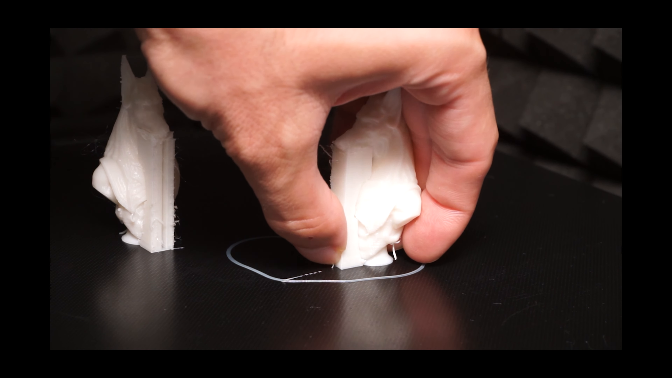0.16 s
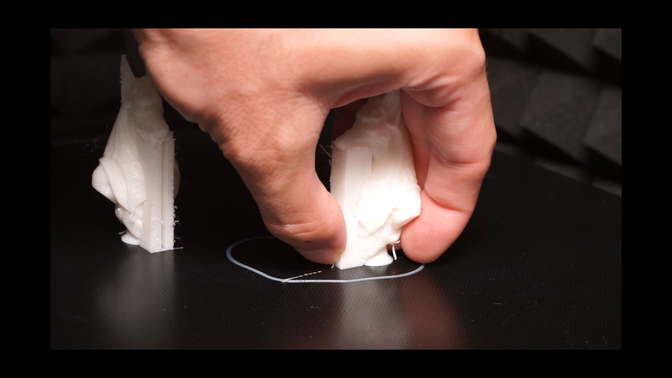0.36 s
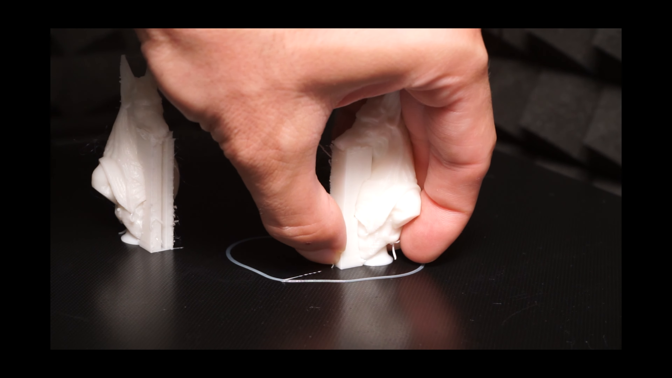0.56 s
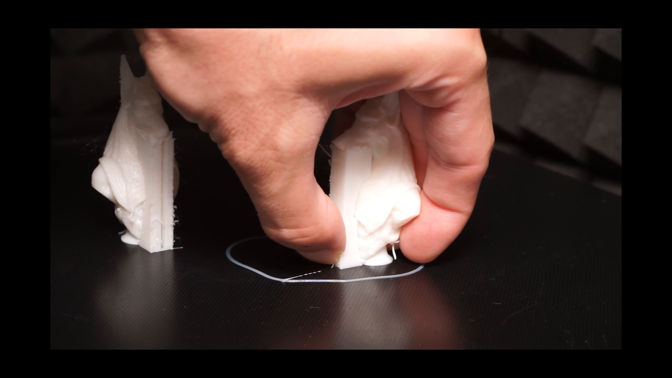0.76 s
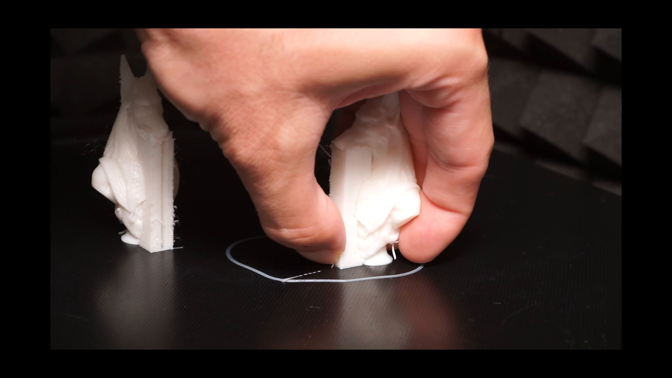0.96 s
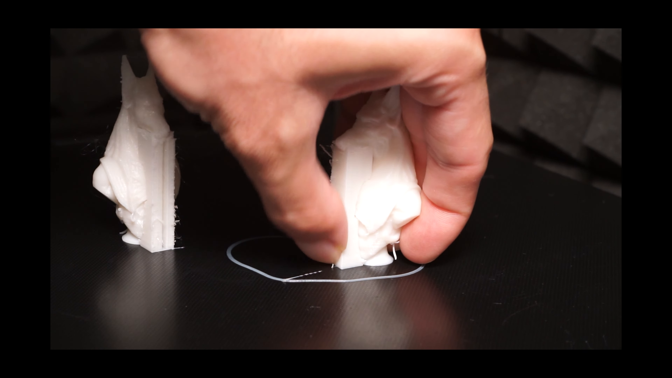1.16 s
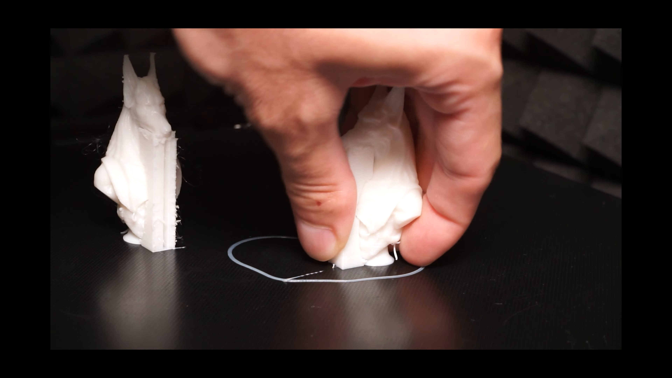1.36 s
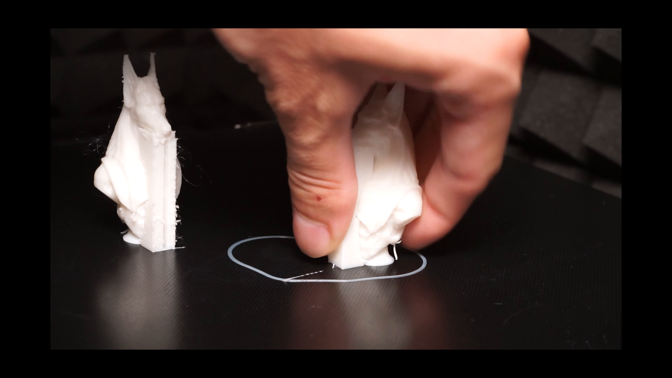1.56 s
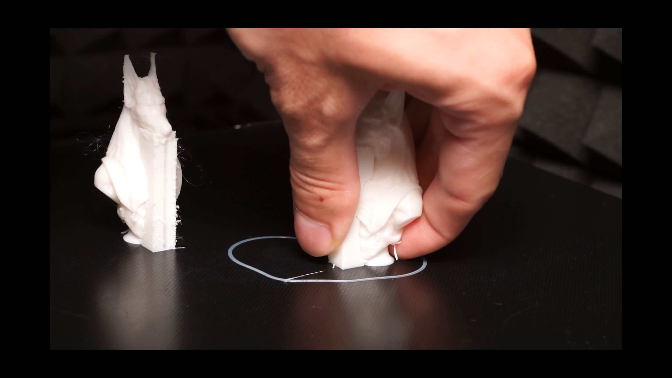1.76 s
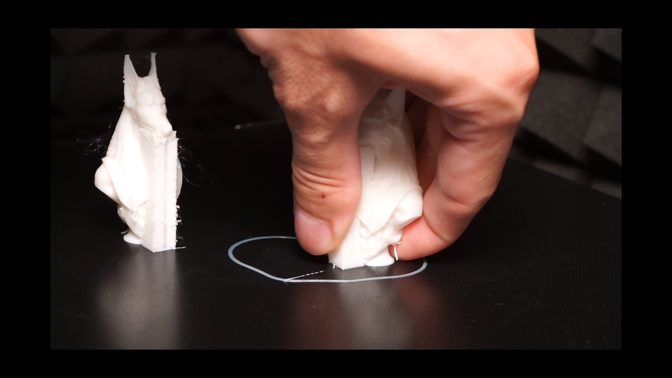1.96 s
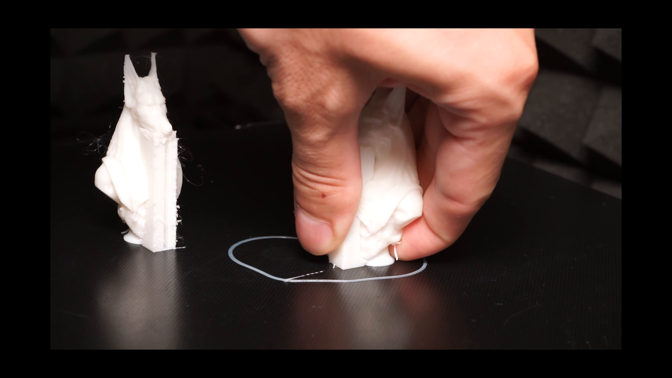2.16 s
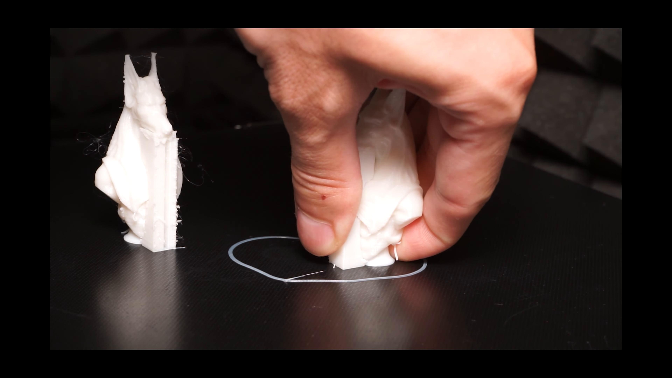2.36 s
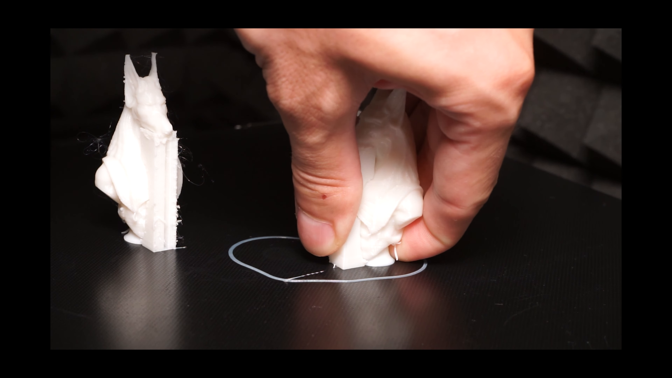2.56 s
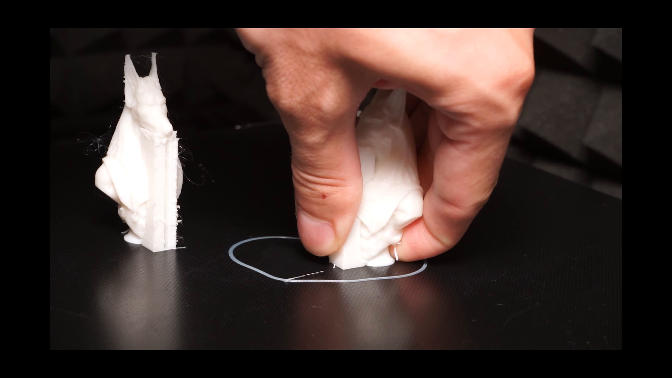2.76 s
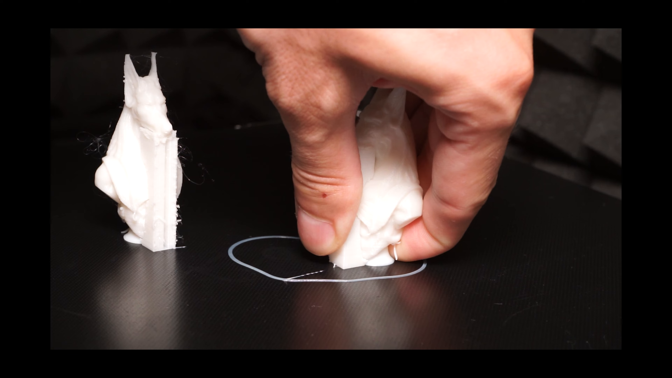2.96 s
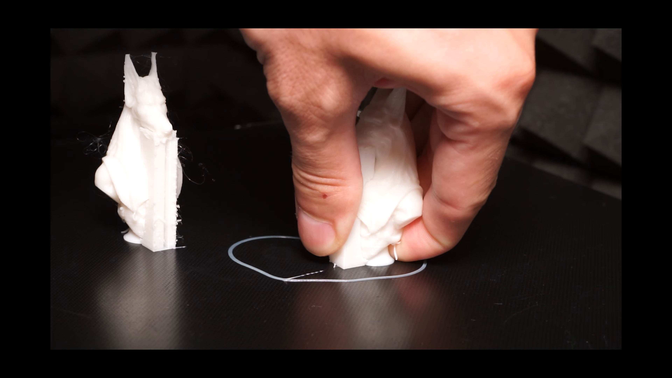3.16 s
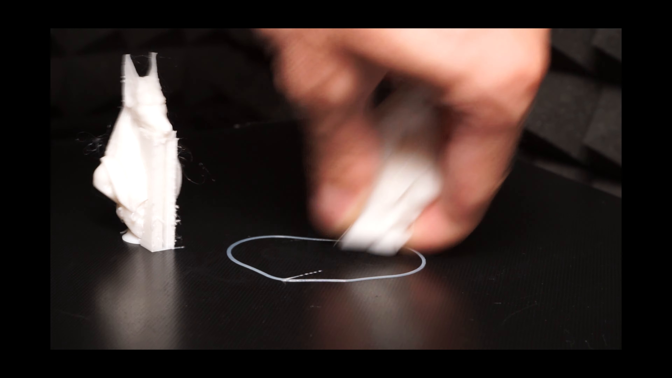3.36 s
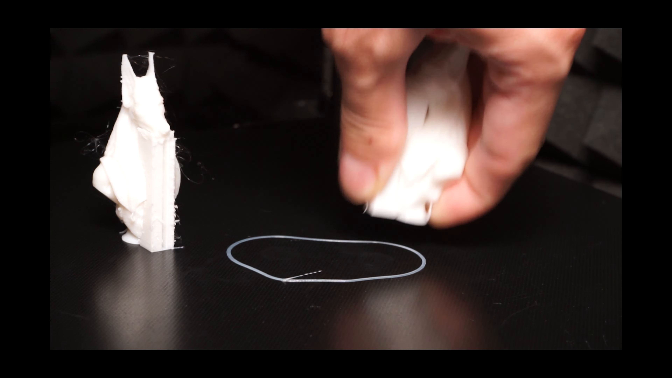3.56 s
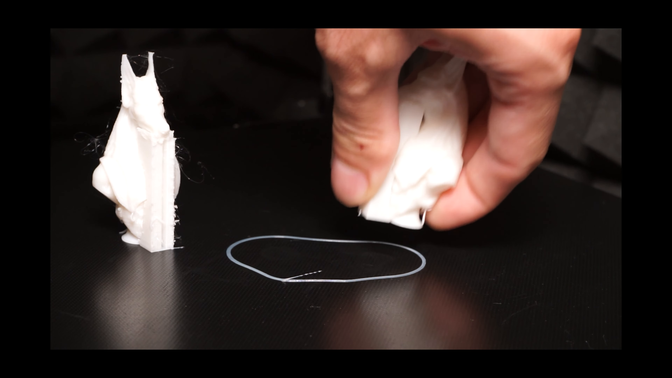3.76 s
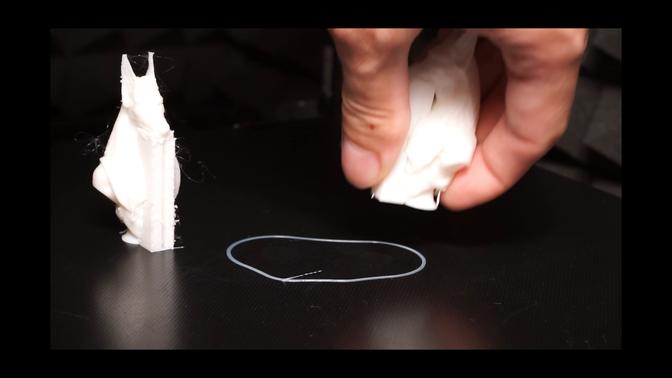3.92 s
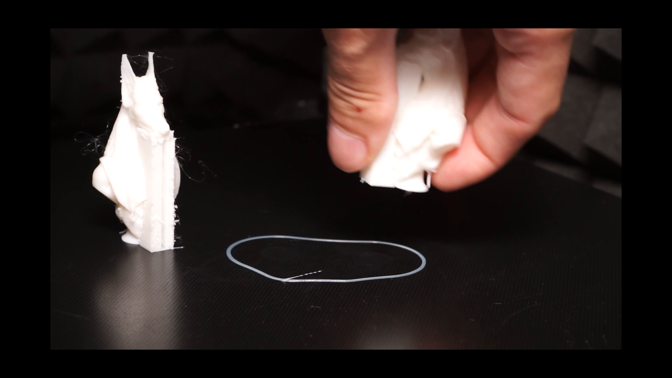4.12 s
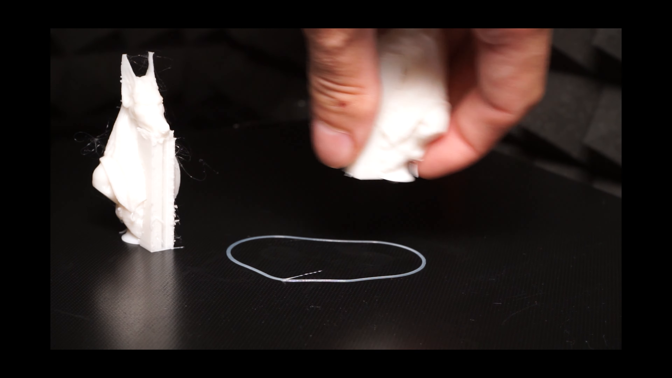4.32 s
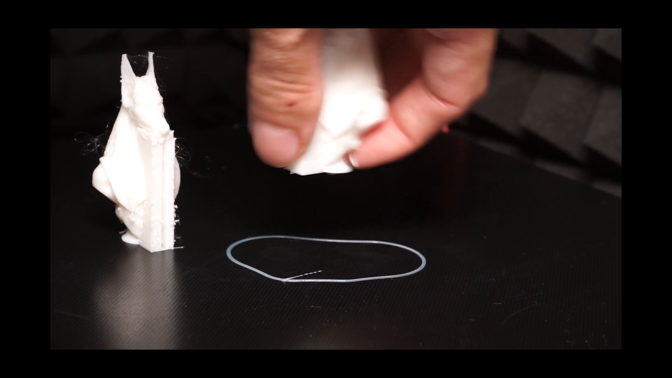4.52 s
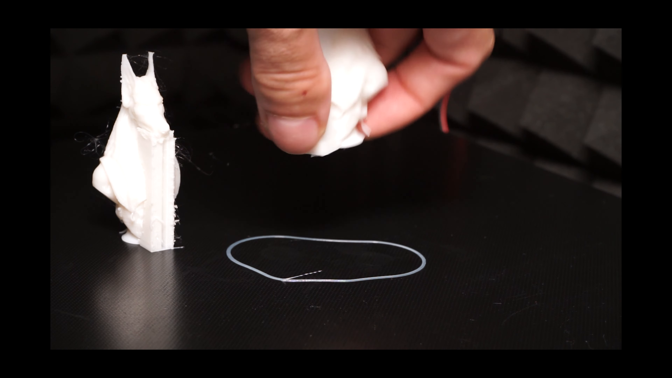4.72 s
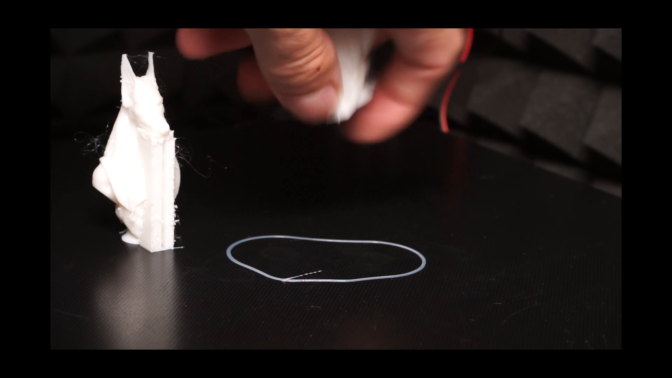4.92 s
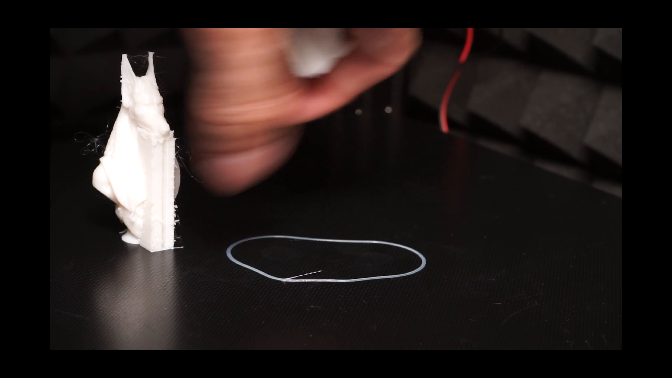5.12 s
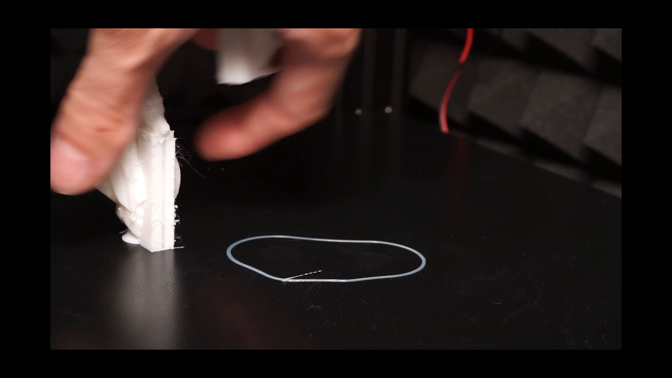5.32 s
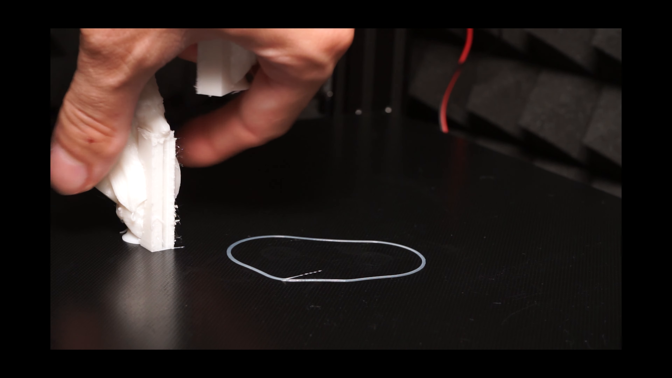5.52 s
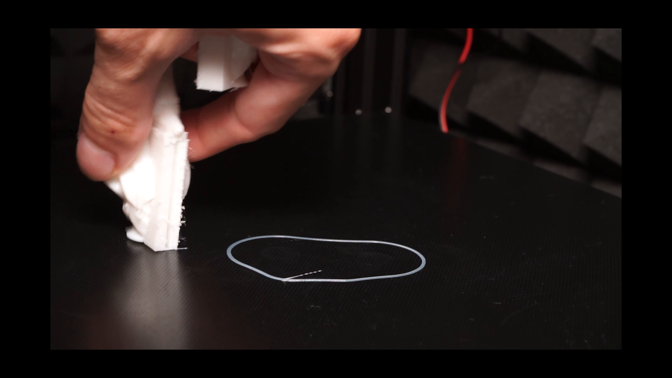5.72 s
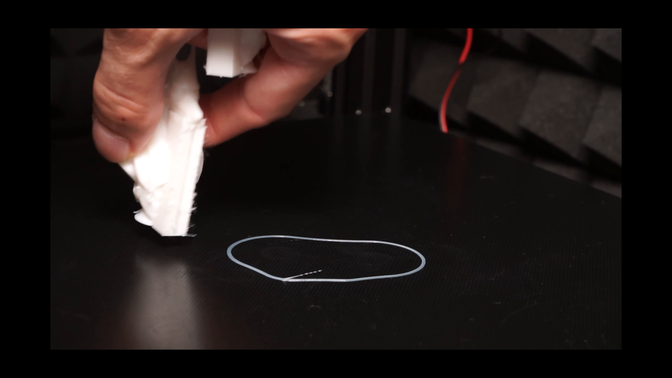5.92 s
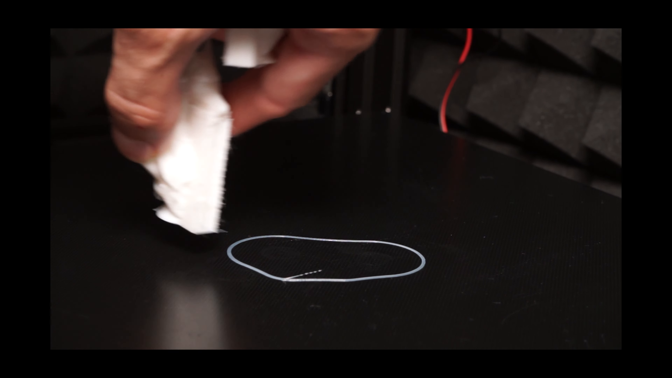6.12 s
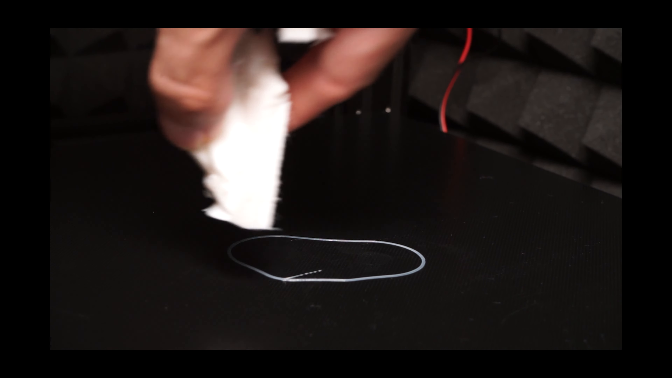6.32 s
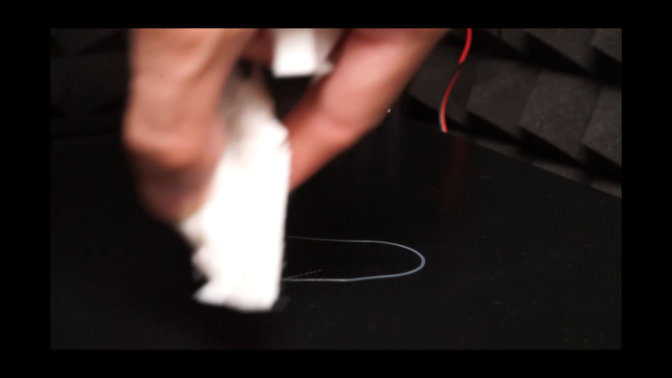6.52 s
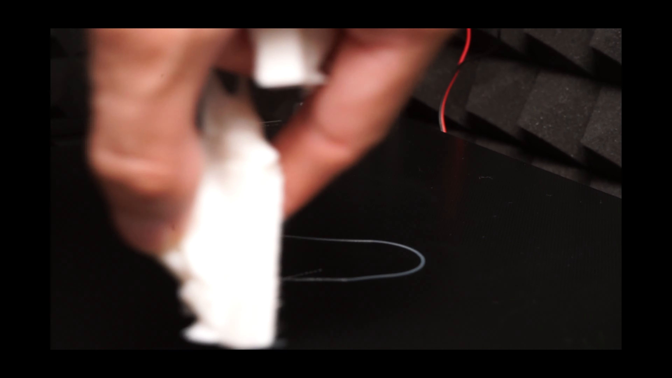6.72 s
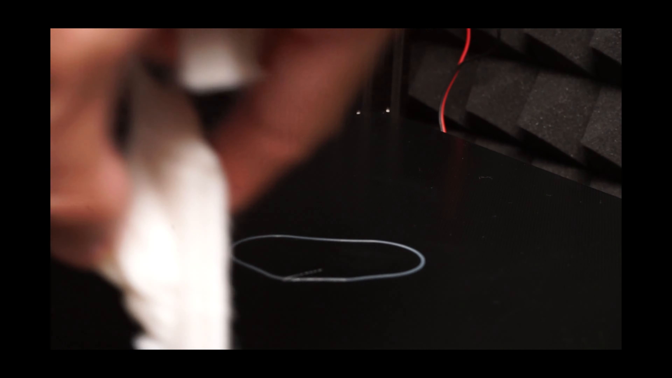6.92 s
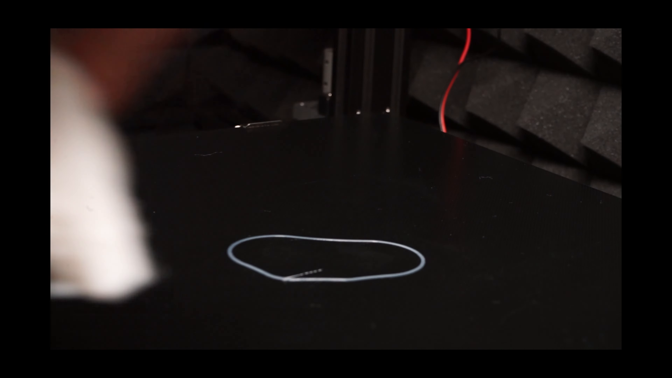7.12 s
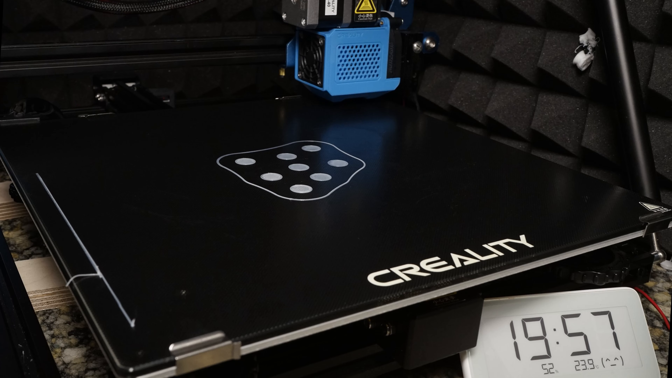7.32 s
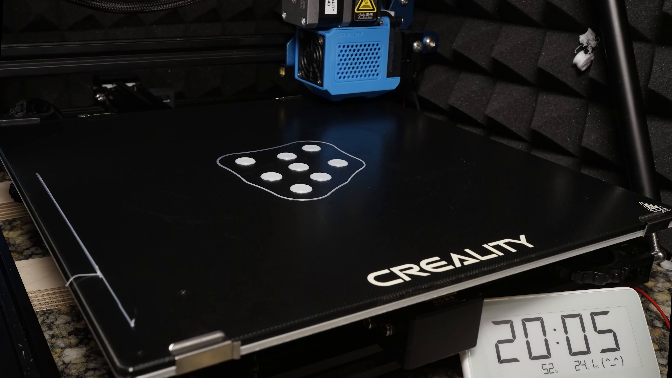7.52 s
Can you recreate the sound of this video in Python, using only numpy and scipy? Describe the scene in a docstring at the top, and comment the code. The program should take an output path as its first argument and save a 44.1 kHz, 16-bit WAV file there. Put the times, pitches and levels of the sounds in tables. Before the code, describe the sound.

A plastic print snaps loose from its bed in several close, dry cracks, followed by soft handling and pieces being set down.

```python
"""Close microphone on a printer bed, inside a foam-lined enclosure. A hand rocks a printed plastic piece,
and the bed sways under it. From 2.1 s the bond gives way in sharp cracks that ring piece and bed; the
last, at 3.4 s, frees the piece and leaves the bed swaying and rattling. From 4 s fingers rub over the
plastic's ridges. Around 7 s two pieces are set down farther off, and at 7.4 s the sound stops abruptly."""
import sys
import numpy as np
from scipy import signal
from scipy.fft import rfft, irfft, next_fast_len
from scipy.io import wavfile
from scipy.ndimage import uniform_filter1d

SR = 44100
rng = np.random.default_rng(int(sys.argv[2]) if len(sys.argv) > 2 else 0)


def wrap_up_sound(samples):
    """Save the sound to the file named by the first command line argument, as 16-bit audio."""
    columns = np.atleast_2d(samples).T
    # keep every value between -1 and 1, then stretch to whole-number steps
    tamed = np.clip(columns, -1, 1)
    steps = np.round(tamed * 32767).astype(np.int16)
    wavfile.write(sys.argv[1], SR, steps)


N = 334454
TIME = np.arange(N) / SR


def amp(db):
    """Decibels to gain."""
    return 10 ** (np.asarray(db) / 20)


def unit(x):
    """Scale to rms 1."""
    return x / np.sqrt(np.mean(x ** 2) + 1e-30)


def along(points, hz):
    """Read (frequency, value) points on a log frequency axis."""
    point_hz, values = np.transpose(points)
    return np.interp(np.log(hz + 1), np.log(point_hz), values)


def fade(t, t60):
    """Exponential decay by 60 dB in t60 seconds."""
    return np.exp(-np.log(1000) * t / t60)


def filtered(x, response):
    """Shape x with a gain given as a function of frequency."""
    size = next_fast_len(len(x) + 4096)
    return irfft(rfft(x, size) * response(np.fft.rfftfreq(size, 1 / SR)), size)[:len(x)]


def noise(spectrum):
    """Coloured noise of rms 1."""
    return unit(filtered(rng.standard_normal(N), lambda hz: amp(along(spectrum, hz))))


def resonances(modes, f):
    """Causal response at frequencies f of modes given as pitch_hz, width_hz, gain_db."""
    return sum(amp(db) * 1j * f * width / (hz * hz - f * f + 1j * f * width) for hz, width, db in modes)


def add(track, start_s, sound):
    """Mix a sound into the track."""
    start = max(0, round(start_s * SR))
    part = sound[:max(0, N - start)]
    track[start:start + len(part)] += part


# Room tone at the microphone: frequency_hz, gain_db
AIR_SPECTRUM = [(120, -37.5), (200, -7), (387, -3.5), (416, -4.5), (558, -6), (709, -7), (1080, -10.5),
                (1590, -14), (15100, -24.5), (16000, -27)]
def air(level_db=-75):
    """Faint, steady air in the enclosure."""
    return amp(level_db) * noise(AIR_SPECTRUM)


# Decay of the space around the bed: frequency_hz, t60_s
ROOM_DECAY = [(200, .4), (1000, 0.27), (4000, .31), (9000, 0.27), (15000, 0.19)]
def room(x):
    """A short, diffuse tail in which the treble dies first."""
    hz, t, spectrum = signal.stft(rng.standard_normal(SR // 2), SR, nperseg=256)
    tail = signal.istft(spectrum * fade(t, along(ROOM_DECAY, hz)[:, None]), SR, nperseg=256)[1]
    return signal.fftconvolve(x, tail / np.linalg.norm(tail))[:N]


# Effort of the hand on piece and bed: time_s, effort_db
HAND_EFFORT = [(0.0, -70.5), (0.2, -74), (1.25, -70.5), (1.49, -64.5), (2.26, -65), (2.78, -71),
               (3.06, -64), (3.43, -67), (3.57, -58), (3.71, -64), (4.36, -63), (4.49, -67), (4.96, -74),
               (5.57, -75), (5.87, -67), (6.21, -71), (7.2, -59), (7.24, -62)]
# Deep rumble and higher tremor of the bed: frequency_hz, gain_db
RUMBLE_SPECTRUM = [(15, -5), (30, -2.5), (48, -0.5), (70, 0), (100, -10), (160, -51)]
FLUTTER_SPECTRUM = [(60, -16), (105, 4.5), (135, 0.5), (200, -2), (300, -8.5), (500, -21), (1000, -31),
                    (3000, -48.5)]
def grip(mean_rumble_db=-60, rumble_growth=.65, flutter_gain_db=2):
    """The gripping hand shakes the bed gently: rumble and flutter both grow with its effort."""
    effort_db = np.interp(TIME, *np.transpose(HAND_EFFORT))
    rumble = amp(mean_rumble_db + rumble_growth * (effort_db - effort_db.mean())) * noise(RUMBLE_SPECTRUM)
    flutter = amp(effort_db + flutter_gain_db) * noise(FLUTTER_SPECTRUM)
    return rumble + flutter


# The hand shifting its hold: middle_s, length_s, hiss_db, rub_db
HAND_SLIDES = [(1.54, 0.96, -71.5, -68), (4.092, 1.36, -73.5, -82), (6.297, 0.87, -80.5, -88)]
# Hiss and low rub of sliding skin: frequency_hz, gain_db
SKIN_HISS = [(200, 0), (500, 8), (1000, 3), (2500, -1), (6000, -1), (9000, -2), (12000, -11.5),
             (16000, -18)]
SKIN_RUB = [(150, -14), (280, 0), (450, -2), (700, -10), (1400, -22), (3000, -45)]
def slides():
    """Each shift of the hand hisses and rubs softly, swelling and fading with its speed."""
    out, hiss, rub = np.zeros(N), noise(SKIN_HISS), noise(SKIN_RUB)
    for middle_s, length_s, hiss_db, rub_db in HAND_SLIDES:
        speed = np.cos(np.pi * np.clip((TIME - middle_s) / length_s, -.5, .5)) ** 2
        out += speed * (amp(hiss_db) * hiss + amp(rub_db) * rub)
    return out


# Fingertips dragged over the layer lines: start_s, length_s, level_db, squeak_hz
FINGER_RUBS = [(4.041, .0047, -72, 14100), (4.058, .053, -68.5, 14200), (4.121, 0.037, -72.5, 14600),
               (4.698, .021, -78.5, 14000), (4.945, .12, -76, 14600), (4.992, .015, -66, 8600),
               (5.649, .025, -76.5, 4900), (5.696, .045, -75, 9000), (5.963, 0.02, -75.5, 7800),
               (6.031, .025, -83, 5700), (6.277, .047, -80.5, 5000), (7.345, .019, -75, 10970)]
# Hiss of the printed ridges: frequency_hz, gain_db
RIDGE_SPECTRUM = [(2000, -6), (4500, -8), (5300, 1), (6500, -1), (8200, 5.5), (10000, -2.5), (11800, 5),
                  (13000, 1), (14500, -3.5), (16000, -21.5)]
def rubs(grain_db=3, edge_s=.0033, squeak_q=24):
    """Skin slips abruptly over the ridges: a grainy hiss with an equally strong, thin squeak."""
    out, t = np.zeros(N), np.arange(SR // 4) / SR
    for start_s, length_s, db, hz in FINGER_RUBS:
        stroke = np.minimum(t / edge_s, 1) * np.exp(-np.maximum(t - length_s, 0) / edge_s)
        roughness = unit(uniform_filter1d(rng.standard_normal(len(t)), size=120))
        grain = unit(amp(grain_db * roughness))
        friction = rng.standard_normal(len(t))
        hiss = unit(filtered(friction, lambda f: amp(along(RIDGE_SPECTRUM, f))))
        squeak = unit(filtered(friction, lambda f: resonances([(hz, hz / squeak_q, 0)], f)))
        add(out, start_s, amp(db) * stroke * grain * (hiss + squeak))
    return out


# Resonances of a blunt contact, in thuds and knocks: pitch_hz, width_hz, gain_db
BLUNT_MODES = [(230, 80, 0.5), (342.2, 130, -2), (510, 110, 3), (810, 150, -10.5), (947.5, 90, -13),
               (1251, 270, -22), (2410, 2700, -15), (5000, 1200, -22), (6950, 2300, -29.5),
               (11500, 2000, -30)]
def thud(hz, t60, rise_s):
    """A low, blunt ring about one octave wide that swells to about rms 1 and dies away."""
    t = np.arange(SR // 3) / SR
    octave = signal.butter(3, [hz / 1.4, hz * 1.4], "band", fs=SR, output="sos")
    ring = filtered(rng.standard_normal(len(t)), lambda f: resonances(BLUNT_MODES, f))
    swell = fade(t, t60) * (1 - np.exp(-t / rise_s))
    return unit(signal.sosfilt(octave, ring)) * swell / swell.max()


# Fingers bumping the pieces: start_s, level_db, pitch_hz
FINGER_BUMPS = [(.553, -51, 120), (1.285, -57, 240), (1.73, -56, 265), (5.662, -50, 405), (5.695, -57, 330),
                (5.72, -58.5, 444), (6.663, -52, 305), (7.346, -51, 230)]
def bumps():
    """Soft skin excites only the low resonances of a piece."""
    out = np.zeros(N)
    for start_s, db, hz in FINGER_BUMPS:
        add(out, start_s, amp(db) * thud(hz, t60=.12, rise_s=.0014))
    return out


# The four ranges of an impact (knock, body, bright, edge): low_hz, high_hz
IMPACT_BANDS = [(180, 1500), (1450, 4500), (4500, 10000), (11300, 15800)]
OCTAVES = np.log2(np.prod(IMPACT_BANDS, axis=1) / np.prod(IMPACT_BANDS[0])) / 2  # above the knock range
def impact(levels_db, modes, spike, spike_s, t60s):
    """A sharp release inside a dying burst of micro-fractures rings the modes, range by range."""
    t = np.arange(SR // 6) / SR
    sound = np.zeros(len(t))
    for band, db, t60 in zip(IMPACT_BANDS, levels_db, t60s):
        drive = rng.standard_normal(len(t)) * fade(t, t60) * np.minimum(t / spike_s, 1)
        drive /= np.linalg.norm(drive)
        drive[round(spike_s * SR)] += spike  # strength of the release against the burst
        ring = filtered(drive, lambda f: resonances(modes, f))
        ring = signal.sosfilt(signal.butter(4, band, "band", fs=SR, output="sos"), ring)
        sound += amp(db) * ring / np.linalg.norm(ring) * np.sqrt(.005 * SR)  # energy of 5 ms at this rms
    return sound


def tilted(db, tilt_db_per_octave):
    """Levels of body, bright and edge on a slope that pivots on the bright range."""
    return db + tilt_db_per_octave * (OCTAVES[1:] - OCTAVES[2])


# Resonances of the printed piece, in nail flicks, strands and cracks: pitch_hz, width_hz, gain_db
PIECE_MODES = [(245.3, 76, -13), (590, 75, -12.5), (920.7, 270, -16.5), (1137, 120, -12.5),
               (1500, 130, -15), (1960, 150, -11.5), (2620, 420, 3.5), (3180, 400, 3), (4000, 360, -4),
               (4850, 400, -7), (5680, 500, -6), (6343, 440, -8), (7600, 600, -8.5), (9040, 300, -10),
               (11568, 650, -18.5), (13150, 960, -11.5)]
# A fingernail catching on the piece: start_s, level_db
NAIL_FLICKS = [(4.0573, -69.5), (4.1058, -63), (4.9973, -68.5), (5.0025, -64)]
def nails(knock_gain_db=-22, body_gain_db=-18):
    """A nail slipping off a ridge flicks the piece lightly, mostly in the treble."""
    out = np.zeros(N)
    for start_s, db in NAIL_FLICKS:
        body_db, bright_db, edge_db = tilted(db, tilt_db_per_octave=6.5)
        levels_db = [db + knock_gain_db, body_db + body_gain_db, bright_db, edge_db]
        flick = impact(levels_db, PIECE_MODES, spike=.7, spike_s=.00048, t60s=[.02, .02, .018, .02])
        add(out, start_s, flick)
    return out


# Pieces and bed knocking, farther from the microphone: start_s, relative_db, tilt_db_per_octave
FAR_KNOCKS = [(.5055, -72.5, 0), (1.2574, -59, -8.5), (1.6989, -61, -4.5), (3.4254, -37.5, -4.5),
              (3.44, -55, -2.5), (3.549, -44.5, -6.5), (3.6433, -61, -4), (6.6238, -62, -3),
              (6.6623, -56.5, -6), (6.744, -67.5, -1), (6.8785, -61.5, -4), (6.938, -34, -3),
              (7.135, -37.5, -4), (7.208, -66, -2)]
# Colour of every knock: knock_db, body_db, bright_db, edge_db
KNOCK_COLOUR = [0, 0.5, 1, -3]
def knocks(ring_gain_db=-1, thud_gain_db=-17):
    """Blunt contacts last longer and ring lower than fractures, and each thuds in the base beneath it."""
    out = np.zeros(N)
    for start_s, db, tilt in FAR_KNOCKS:
        levels_db = db + ring_gain_db + tilt * OCTAVES + KNOCK_COLOUR
        ring = impact(levels_db, BLUNT_MODES, spike=.81, spike_s=.0008, t60s=[.061, .035, .028, .022])
        add(out, start_s, ring)
        add(out, start_s, amp(db + thud_gain_db) * thud(hz=125, t60=.27, rise_s=.003))
    return out


# Pushes on the bed's carriage: start_s, level_db
BED_PUSHES = [(.001, -49.5), (.551, -41.5), (1.789, -45.5), (2.96, -44.5), (3.42, -27), (6.56, -51),
              (7.241, -46)]
SWAY_HZ = 47.8
def sway(t60=1.0, rise_s=.0067):
    """The heavy bed swings on its belt after each push."""
    out, t = np.zeros(N), np.arange(SR) / SR
    swing = np.sin(2 * np.pi * SWAY_HZ * t) * fade(t, t60) * (1 - np.exp(-t / rise_s))
    for start_s, db in BED_PUSHES:
        add(out, start_s, amp(db) * swing)
    return out


# Loose parts of the bed: frequency_hz, gain_db
RATTLE_SPECTRUM = [(100, -8), (220, 3.5), (420, 3), (580, -1), (900, -9.5), (1500, -13), (2400, -14.5),
                   (4000, -22), (8000, -23.5), (12000, -31.5), (16000, -44)]
def rattle(freed_s, chatter_db=-42, linger_gain_db=-20, swing_db=2.5, strands_db=-74, strands_per_s=60):
    """Once the bed is freed, its loose parts chatter with each swing while stray strands tick apart."""
    age = np.maximum(TIME - freed_s, 0)
    ticks = (rng.random(N) < strands_per_s / SR) * rng.standard_normal(N)
    treble_modes = PIECE_MODES[-6:]
    ticks = unit(filtered(ticks, lambda f: amp(along(RIDGE_SPECTRUM, f)) * resonances(treble_modes, f)))
    strands = amp(strands_db) * fade(age, t60=1.5) * ticks
    settling = fade(age, t60=.42) + amp(linger_gain_db) * fade(age, t60=1.0)
    swing = amp(swing_db * np.cos(2 * np.pi * SWAY_HZ * age))
    chatter = amp(chatter_db) * settling * swing * noise(RATTLE_SPECTRUM)
    return (TIME > freed_s) * (chatter + strands)


# The bond breaking, close to the microphone: start_s, bright_db, tilt_db_per_octave, knock_db
BOND_CRACKS = [(2.0934, -51.5, -2.5, -57), (2.102, -37, -1.5, -55.5), (2.1036, -23.5, 5, -39),
               (2.124, -59.5, 4, -73), (2.4233, -63, 1, -80), (2.4505, -24, 2, -45.5),
               (2.493, -45.5, 5.5, -70), (2.498, -54, 2, -72.5), (2.528, -52.5, 1, -70.5),
               (2.5705, -25, 0, -47), (2.7655, -82, -15, -55), (2.8465, -75, -16, -53.5),
               (3.0176, -23, -4, -38.5), (3.2193, -77, -15.5, -55.5), (3.4009, -14, -3, -27)]
# Colour of every crack above its knock: body_db, bright_db, edge_db
CRACK_COLOUR = [-3, 0, -7.5]
# Modes of the bed under the piece: pitch_hz, gain_db, t60_s
BED_MODES = [(129, -7, .31), (247.6, 1, 0.25), (355, -9.5, 0.14), (510, -5, 0.14), (565, 3.5, 0.12),
             (660, -2, .05), (955, -3, .05), (1050, -7.5, 0.12)]
def cracks(bed_gain_db=-10, scatter_db=2):
    """Each fracture rings the piece for a moment and the bed for longer."""
    out, t = np.zeros(N), np.arange(SR // 2) / SR
    for start_s, bright_db, tilt, knock_db in BOND_CRACKS:
        levels_db = [knock_db, *(tilted(bright_db, tilt) + CRACK_COLOUR)]
        snap = impact(levels_db, PIECE_MODES, spike=1.4, spike_s=.00042, t60s=[.026, .014, .013, .013])
        add(out, start_s, snap)
        bed_ring = sum(amp(db + rng.normal(0, scatter_db)) * fade(t, t60) * np.sin(2 * np.pi * hz * t)
                       for hz, db, t60 in BED_MODES)
        add(out, start_s, amp(knock_db + bed_gain_db) * bed_ring)
    return out


def scene(near_room_db=-41, far_room_db=-8):
    """At the microphone the cracks are close and dry; the farther knocks stir more of the room."""
    near, far = cracks(), knocks()
    echo = room(amp(near_room_db) * near + amp(far_room_db) * far)
    handling = grip() + slides() + rubs() + nails() + bumps()
    bed = sway() + rattle(freed_s=BOND_CRACKS[-1][0])
    return (air() + echo + handling + far + bed + near)[None]


def record(dry, ceiling=.78, stop_s=7.384, cut_s=.004, top_hz=16000):
    """One channel: the loudest peaks are rounded off, the sound stops short, the top is band-limited."""
    rounded = dry[0] / (1 + np.abs(dry[0] / ceiling) ** 4) ** (1 / 4)
    running = np.clip((stop_s - TIME) / cut_s, 0, 1)
    return filtered(rounded * running, lambda hz: 1 / (1 + (hz / top_hz) ** 120))[None]


dry = scene()
out = record(dry)
wrap_up_sound(out)
```